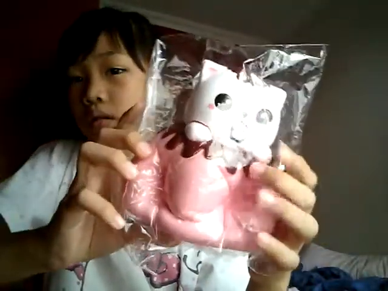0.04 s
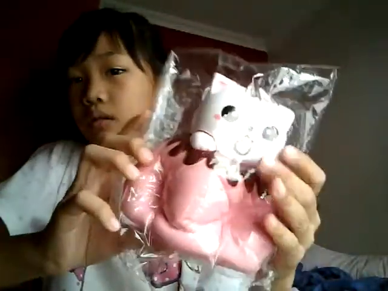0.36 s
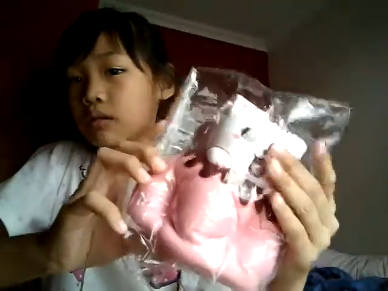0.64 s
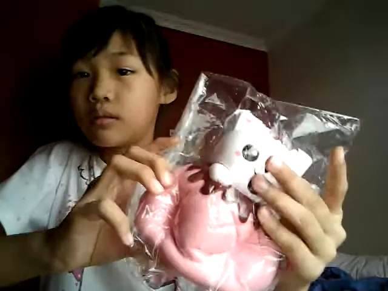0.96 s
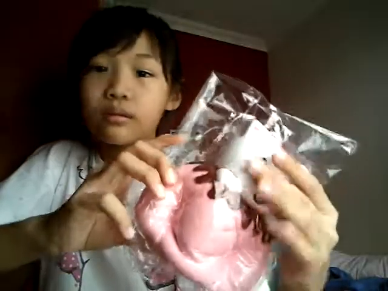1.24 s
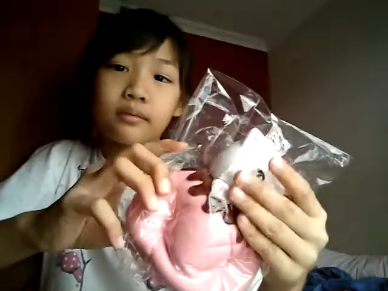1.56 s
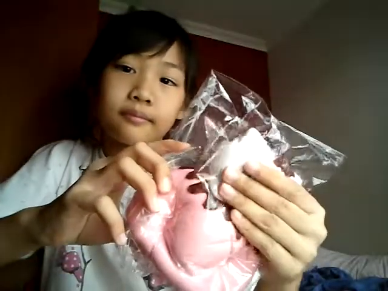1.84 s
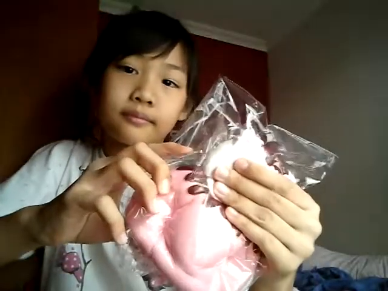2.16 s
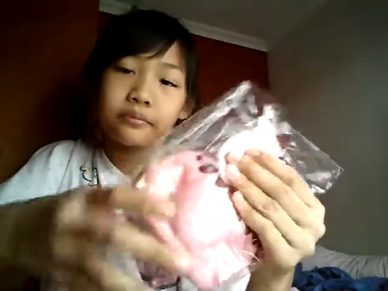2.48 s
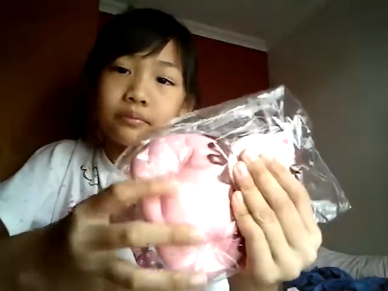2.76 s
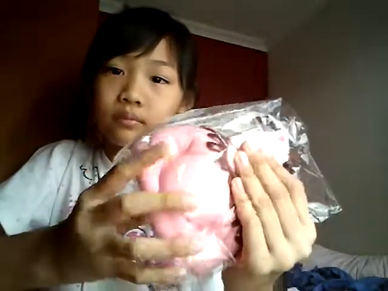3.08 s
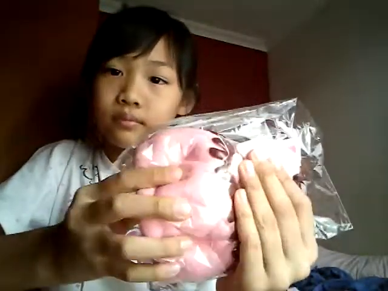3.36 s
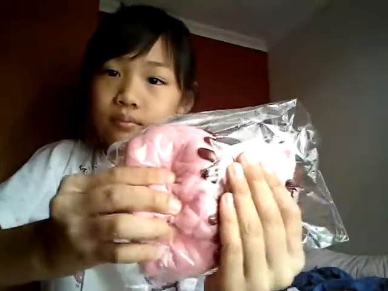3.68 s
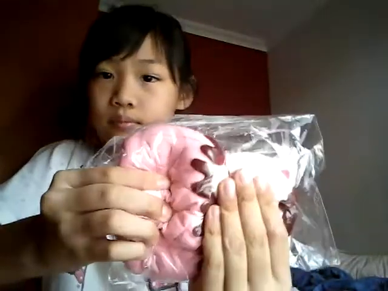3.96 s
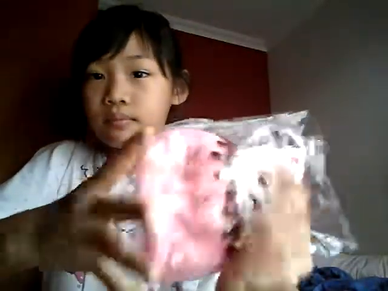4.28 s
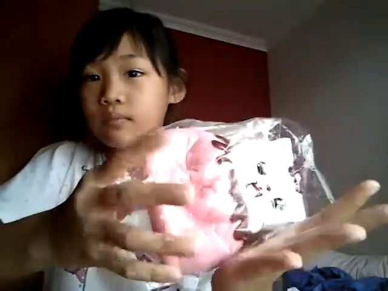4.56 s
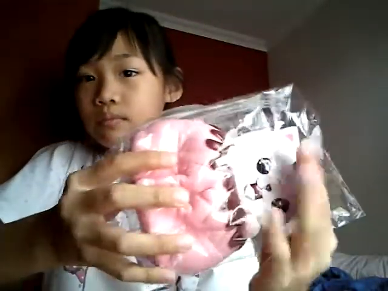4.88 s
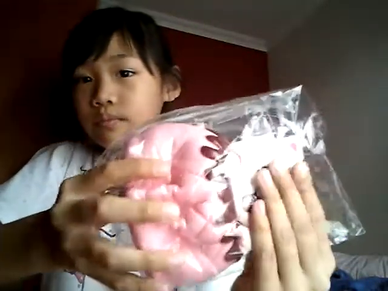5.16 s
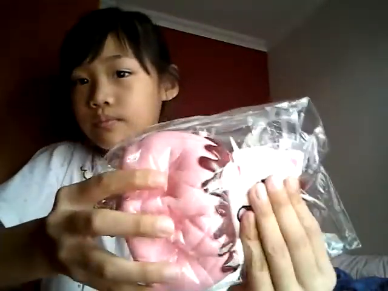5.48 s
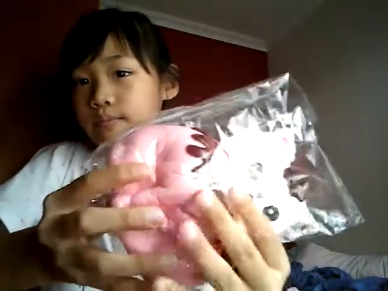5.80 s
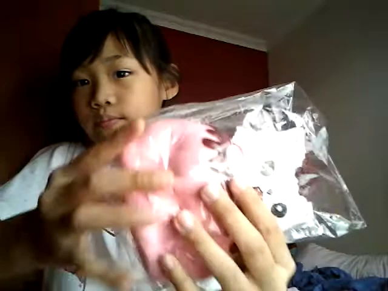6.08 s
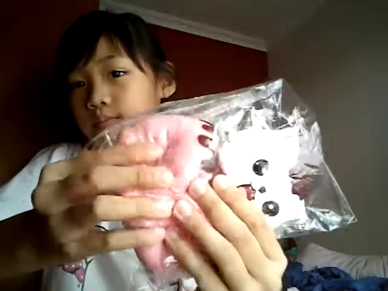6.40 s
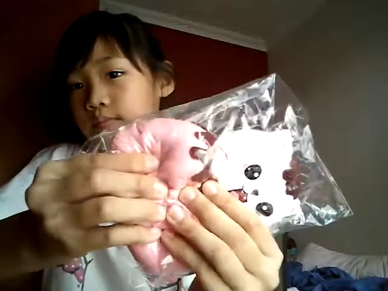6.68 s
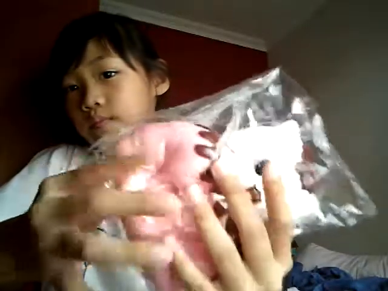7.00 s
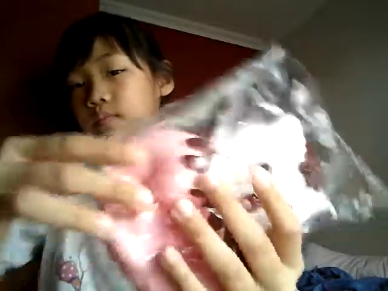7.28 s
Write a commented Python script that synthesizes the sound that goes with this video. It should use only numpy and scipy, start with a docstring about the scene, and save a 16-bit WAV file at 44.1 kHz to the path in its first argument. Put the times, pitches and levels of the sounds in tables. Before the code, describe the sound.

Thin plastic bag crinkling and crackling close up as a soft foam toy is squeezed and turned inside it.

```python
"""Thin plastic crackles close by in a quiet room: a soft foam toy is squeezed and turned inside a bag.
Each finger press sets off a run of tiny buckles: broad panels pop low, creases snap high, tips tick.
Between presses the held bag crackles more softly. Trapped air rings, film squeaks under a fingertip,
the toy rubs and thumps. Each buckle scatters off the hands and dies away in the room."""
import sys
import numpy as np
from scipy import signal
from scipy.fft import rfft, irfft, next_fast_len
from scipy.io import wavfile
from scipy.ndimage import map_coordinates

SR = 44100
rng = np.random.default_rng(int(sys.argv[2]) if len(sys.argv) > 2 else 0)


def store_pcm(level_fs):
    """Save levels as 16-bit WAV."""
    pcm = np.round(np.clip(level_fs, -1, 1) * 32767).astype(np.int16)
    wavfile.write(sys.argv[1], SR, np.atleast_2d(pcm).T)


N = 328104

# room noise spectrum: (frequency [Hz], relative density [dB])
ROOM_NOISE = [(35, -26), (55, -21), (76, 1.5), (95, -15.5), (135, -1), (180, -12), (1200, -21),
              (4000, -19.5), (15000, -62)]
# room decay: (frequency [Hz], T60 [s])
ROOM_DECAY = [(200, 0.73), (1000, 0.09), (5000, 0.23), (15000, 0.69)]
# microphone response: (frequency [Hz], gain [dB])
MIC_RESPONSE = [(40, 0), (130, 4.5), (250, 2.5), (500, 4), (850, 3), (1250, 1), (1500, -1), (2350, 6),
                (2650, 0.5), (3100, -1.2), (5400, -1.8), (8500, -2), (10500, -11), (13500, -10),
                (15800, -1)]
# resonances of its housing and surroundings: (centre [Hz], width [Hz], gain [dB])
MIC_RESONANCES = [(326.6, 83, 6.5), (426, 111, 6), (675, 113, 3.5), (1020, 390, 3), (1665, 253, 4),
                  (3650, 570, 2.5), (5520, 830, 3), (8770, 690, 1.5), (15500, 500, -3.5)]
# low shelf as the bag turns: (time [s], gain [dB])
LOW_SHELF = [(0, 3), (0.7, 6.5), (1.05, -0.5), (1.6, -1), (2.4, 2.5), (2.8, 2.5), (3.3, -2), (3.9, -3),
             (4.6, 3), (5.35, -3), (5.8, -2), (6.3, -1), (7.0, -0.5), (7.44, -3.5)]
# bumps of the toy as the grip shifts: (time [s], relative peak [dB])
TOY_BUMPS = [(1.017, -37), (2.366, -28), (2.392, -28), (3.285, -26), (7.298, -28)]
# film slipping under a fingertip: (mid time [s], pitch [Hz], relative level [dB])
FILM_SLIPS = [(1.75, 990, -29), (1.924, 1090, -34), (2.163, 1220, -30), (2.835, 1080, -33),
              (2.93, 1060, -34), (2.954, 1060, -30), (3.171, 1070, -36), (3.289, 1060, -29),
              (3.917, 1100, -24), (3.96, 980, -34), (3.98, 940, -28), (4.376, 1090, -33),
              (4.792, 1150, -32), (5.261, 1080, -27), (5.363, 1080, -30), (5.506, 1100, -31),
              (5.94, 1085, -27), (6.123, 1035, -33), (7.3, 1010, -24.5)]
# wide stretches of film inverting: (time [s], pitch [Hz], relative level [dB])
WIDE_POPS = [(1.003, 450, -34), (1.018, 435, -33), (1.331, 520, -28), (2.206, 603, -33), (2.889, 660, -32),
             (2.978, 690, -31.5), (3.069, 640, -34), (3.609, 620, -29), (3.896, 610, -31.5),
             (4.043, 690, -31), (6.126, 464, -33), (6.555, 680, -26.5), (6.998, 680, -30.5)]
# crackle of the held bag: (time [s], relative level [dB])
HELD_CRACKLE = [(0, -55), (0.64, -57), (1.08, -43), (1.9, -36), (2.45, -38.5), (2.62, -42), (2.8, -41),
                (2.95, -45), (3.05, -39), (3.5, -35), (3.85, -43), (4.05, -42), (4.14, -46), (4.25, -41),
                (4.42, -42), (4.67, -47), (4.95, -41), (5.1, -49.5), (5.35, -41), (5.95, -40), (6.5, -32),
                (6.8, -36), (7.2, -45), (7.44, -42)]
# its mix: (panels [dB], creases [dB], tips [dB])
HELD_MIX_DB = [0, -0.5, -15.5]
# presses: (start [s], length [s], relative panel level [dB], creases re panels [dB], tips re panels [dB])
FINGER_PRESSES = [(0.038, 0.012, -44, -3, -19), (0.113, 0.051, -42, -2, -11.5), (0.222, 0.04, -38, 0, -12),
                  (0.352, 0.047, -39.5, 1, -8.5), (0.427, 0.048, -39, -1, -14), (0.505, 0.08, -41, 0, -10),
                  (0.682, 0.063, -42, 0, -13), (0.814, 0.116, -39, 1, -15), (0.927, 0.087, -33, -1, -10.5),
                  (1.075, 0.067, -43, 3, -11), (1.188, 0.04, -37, 2, -8), (1.304, 0.068, -35, 0, -12),
                  (1.386, 0.049, -39, -1, -9), (1.496, 0.025, -33, -2, -14), (1.597, 0.027, -36, 3, -7),
                  (1.715, 0.067, -33, 2, -18), (1.842, 0.18, -34.5, -0.5, -13),
                  (2.085, 0.11, -36.5, -1, -9), (2.241, 0.082, -35, 0, -7), (2.345, 0.056, -35.5, 1, -10),
                  (2.451, 0.092, -34, 3, -10.5), (2.634, 0.025, -36, 1, -8), (2.673, 0.057, -33, 0, -10),
                  (2.753, 0.02, -41, 7, -11), (2.87, 0.03, -35, 1, -13), (2.985, 0.07, -35, -1, -9.5),
                  (3.101, 0.105, -40, -1, -7), (3.258, 0.07, -32, 1, -6.5), (3.37, 0.04, -38, 1, -6),
                  (3.435, 0.135, -35, 2.5, -6), (3.608, 0.07, -36, 1, -5.5), (3.707, 0.056, -42, 0, -9),
                  (3.814, 0.036, -37, -2, -24), (3.904, 0.035, -31, -3, -13), (3.952, 0.027, -39, -3, -8),
                  (4.026, 0.025, -33, -5, -9), (4.184, 0.075, -35, -2, -8), (4.258, 0.075, -29.5, 3, -9),
                  (4.329, 0.068, -34, 0, -8), (4.468, 0.085, -39, 0, -14), (4.58, 0.035, -41, 7, -8),
                  (4.723, 0.105, -41, 1, -10), (4.857, 0.012, -35, -1, -11), (4.903, 0.06, -37, -1, -10),
                  (4.973, 0.018, -39, 3, -14), (5.047, 0.012, -44, 2, -5), (5.122, 0.071, -32, 1, -13),
                  (5.196, 0.1, -31, 0.5, -11), (5.302, 0.106, -35, 0, -19), (5.421, 0.086, -37, 0, -16),
                  (5.593, 0.03, -36, -2, -2), (5.63, 0.03, -32, 0, -9), (5.726, 0.114, -34, -2, -24),
                  (5.972, 0.03, -39, 0, -10), (6.088, 0.067, -31, -2, -10), (6.213, 0.27, -30, -1.81, -11),
                  (6.551, 0.12, -29, -2, -11), (6.818, 0.069, -32, 0.5, -6), (6.896, 0.125, -31, 3.5, -7),
                  (7.043, 0.028, -42, 3, -14), (7.119, 0.07, -37, 0, -11.5), (7.24, 0.105, -31, -1, -15),
                  (7.39, 0.05, -31, 1, -15)]
# distinct buckles, relative levels: (time [s], panel [Hz], panel [dB], crease [Hz], crease [dB], tip [dB])
BUCKLES = [(0.0424, 1500, -41, 5400, -45, -69), (0.0726, 1620, -56, 5100, -42, -64),
           (0.1139, 1900, -39, 5000, -37, -57), (0.1419, 1960, -42, 4400, -37, -47),
           (0.2135, 1410, -47, 4900, -36, -52), (0.2297, 1810, -28, 4700, -30, -42),
           (0.2511, 1750, -39, 5700, -33, -50), (0.3553, 1570, -38, 4900, -36, -50),
           (0.3957, 1540, -32, 6800, -29, -32), (0.4366, 780, -38, 5500, -34, -47),
           (0.5574, 1430, -43, 5400, -36, -40), (0.5877, 1150, -35, 5200, -37, -46),
           (0.6749, 1820, -41, 4100, -40, -56), (0.6832, 2280, -39, 4200, -33, -53),
           (0.7369, 1190, -35, 6300, -42, -42), (0.7719, 2010, -39, 5400, -38, -57),
           (0.7827, 1510, -55, 5300, -36, -50), (0.8235, 1590, -31, 4600, -36, -46),
           (0.8459, 1870, -31, 4800, -34, -47), (0.8729, 1820, -37, 4700, -32, -46),
           (0.948, 1470, -28, 4900, -24, -40), (0.9948, 1580, -38, 5000, -29, -38),
           (1.0175, 1440, -34, 5000, -29, -48), (1.09, 1500, -38, 5300, -38, -41),
           (1.1411, 1660, -32, 4700, -33, -37), (1.172, 1190, -40, 4800, -34, -43),
           (1.2026, 1500, -41, 5400, -34, -38), (1.3132, 1650, -35, 5100, -27, -47),
           (1.3299, 1360, -26, 4600, -43, -59), (1.3393, 1670, -27, 5000, -30, -41),
           (1.3733, 1360, -37, 5600, -30, -45), (1.566, 1740, -32, 4200, -35, -48),
           (1.6904, 1220, -32, 5500, -27, -33), (1.7479, 1020, -25, 4100, -27, -43),
           (1.7607, 1200, -28, 5700, -34, -32), (1.7992, 1600, -29, 4500, -34, -50),
           (1.8445, 1520, -31, 4700, -30, -40), (1.8547, 1140, -25, 5400, -29, -33),
           (1.8818, 1470, -27, 4400, -26, -36), (1.9196, 1590, -27, 4500, -26, -41),
           (1.9925, 1840, -24, 3900, -27, -46), (1.9974, 1260, -22, 4700, -37, -45),
           (2.0678, 1300, -24, 3800, -34, -61), (2.1597, 1880, -27, 4700, -29, -43),
           (2.1801, 1400, -35, 4300, -31, -45), (2.2037, 1420, -29, 4600, -31, -43),
           (2.2278, 1720, -34, 5000, -27, -33), (2.2379, 1980, -24, 4500, -35, -43),
           (2.2436, 1010, -26, 4300, -27, -40), (2.3028, 1590, -26, 5000, -27, -37),
           (2.367, 1110, -20, 4200, -32, -38), (2.3731, 1150, -34, 5400, -30, -36),
           (2.3933, 970, -19, 4900, -32, -36), (2.4437, 1680, -36, 5200, -24, -40),
           (2.6011, 1830, -45, 5100, -40, -42), (2.6591, 1500, -46, 5500, -31, -48),
           (2.6868, 1340, -29, 5900, -32, -45), (2.7148, 1960, -25, 3600, -30, -54),
           (2.7834, 1170, -38, 5300, -32, -47), (2.8124, 1840, -41, 5100, -31, -59),
           (2.8576, 1240, -25, 4700, -34, -40), (2.8764, 1510, -28, 5000, -21, -34),
           (2.8927, 1460, -37, 5600, -28, -41), (2.9216, 1840, -41, 5200, -38, -39),
           (2.9585, 1630, -47, 5200, -35, -54), (3.0696, 1550, -24, 4400, -29, -40),
           (3.1037, 1990, -27, 3900, -27, -41), (3.1305, 1730, -28, 5200, -32, -49),
           (3.1876, 1770, -31, 6300, -32, -33), (3.2013, 1940, -50, 5200, -33, -37),
           (3.246, 1190, -29, 4200, -27, -35), (3.2676, 1240, -26, 5300, -28, -37),
           (3.4195, 1550, -27, 4100, -32, -38), (3.5327, 2120, -34, 5300, -24, -31),
           (3.5713, 1460, -27, 5000, -25, -34), (3.6089, 1210, -19, 4400, -30, -36),
           (3.6779, 1870, -27, 4600, -26, -37), (3.7239, 1790, -36, 5200, -33, -49),
           (3.7507, 1840, -35, 4400, -31, -37), (3.8317, 1870, -25, 4800, -36, -31),
           (3.8449, 1720, -27, 4000, -37, -60), (3.8932, 1870, -34, 4800, -30, -32),
           (3.9099, 1690, -44, 5900, -22, -48), (3.9286, 1740, -28, 5000, -31, -52),
           (3.978, 1380, -26, 5600, -40, -48), (3.994, 1910, -42, 5500, -33, -47),
           (4.0088, 1510, -29, 6800, -31, -37), (4.0402, 1440, -27, 6300, -46, -51),
           (4.0457, 880, -25, 5100, -31, -42), (4.0584, 1500, -26, 4900, -33, -51),
           (4.0948, 1770, -27, 5300, -40, -46), (4.1141, 1310, -24, 4600, -42, -60),
           (4.1561, 1970, -25, 5900, -32, -37), (4.2345, 1480, -23, 4800, -31, -39),
           (4.2955, 1570, -33, 4900, -21, -31), (4.3966, 1250, -27, 4500, -35, -52),
           (4.4649, 1950, -49, 4800, -34, -44), (4.4905, 1400, -32, 5200, -29, -46),
           (4.4949, 1380, -24, 3700, -34, -50), (4.5187, 1240, -27, 4600, -41, -60),
           (4.6231, 1300, -33, 4600, -32, -45), (4.6776, 1700, -36, 5300, -36, -44),
           (4.742, 1420, -30, 5100, -30, -46), (4.7657, 1440, -39, 4600, -33, -62),
           (4.876, 1210, -27, 4700, -27, -42), (4.9778, 1230, -33, 5200, -34, -40),
           (4.9845, 2180, -33, 4000, -29, -50), (4.9972, 2050, -24, 4400, -30, -53),
           (5.0335, 1540, -35, 4500, -27, -50), (5.134, 1260, -30, 4700, -30, -42),
           (5.1568, 1650, -39, 5200, -42, -35), (5.1659, 1670, -30, 5700, -24, -35),
           (5.2266, 1630, -25, 4800, -27, -40), (5.2757, 1760, -27, 4800, -32, -40),
           (5.2878, 1230, -28, 5500, -25, -37), (5.3695, 1240, -35, 4900, -29, -53),
           (5.3968, 1300, -33, 4700, -26, -52), (5.4461, 1380, -39, 4900, -32, -41),
           (5.4814, 1870, -34, 4200, -31, -43), (5.4994, 1750, -32, 5300, -28, -38),
           (5.5317, 1420, -35, 4700, -29, -50), (5.5458, 1420, -29, 6700, -33, -41),
           (5.6079, 1720, -27, 5500, -36, -47), (5.6349, 1820, -27, 4100, -27, -45),
           (5.6487, 2060, -41, 5100, -27, -39), (5.7433, 1650, -37, 5500, -24, -34),
           (5.7631, 1710, -24, 4000, -26, -41), (5.806, 1710, -23, 4400, -24, -38),
           (5.8503, 2110, -24, 4800, -33, -41), (5.8604, 1730, -30, 4900, -29, -39),
           (5.8833, 1980, -32, 4800, -32, -43), (5.9619, 1570, -28, 4300, -30, -42),
           (5.9762, 1510, -37, 5100, -30, -46), (6.0108, 1190, -38, 4500, -30, -47),
           (6.0301, 1980, -36, 5200, -22, -42), (6.0687, 1190, -51, 5200, -31, -35),
           (6.1128, 1260, -38, 4300, -28, -36), (6.3124, 1510, -34, 5400, -23, -34),
           (6.4015, 1870, -29, 6100, -30, -35), (6.5255, 1450, -39, 4800, -22, -48),
           (6.5536, 1370, -16, 6100, -27, -35), (6.609, 1020, -32, 4600, -22, -49),
           (6.6412, 1570, -35, 5500, -25, -37), (6.7725, 1850, -24, 4300, -28, -38),
           (6.867, 2000, -40, 4500, -26, -44), (6.8759, 1480, -25, 4000, -24, -36),
           (6.9098, 2050, -27, 4700, -25, -30), (6.9985, 1280, -23, 3900, -25, -37),
           (7.0567, 2130, -33, 5700, -25, -39), (7.0949, 1490, -30, 5600, -29, -34),
           (7.1269, 1860, -25, 5000, -29, -41), (7.1487, 2090, -34, 4700, -32, -48),
           (7.2352, 1760, -31, 4600, -29, -38), (7.2559, 1800, -24, 4500, -34, -44),
           (7.3169, 1740, -29, 6100, -32, -38), (7.3828, 1180, -34, 4700, -28, -49),
           (7.4102, 1580, -28, 4800, -29, -35)]

TOP_HZ = 15850


def amp(db):
    """Decibels to gain."""
    return 10 ** (np.asarray(db) / 20)


def unit(x):
    """Scale to rms 1."""
    return x / np.sqrt(np.mean(x ** 2) + 1e-20)


def along(points, hz):
    """Interpolate (Hz, value) points on a log axis."""
    knots_hz, values = np.transpose(points)
    return np.interp(np.log(hz + 1), np.log(knots_hz), values)


def curve(points):
    """Interpolate (s, value) points per sample."""
    return np.interp(np.arange(N) / SR, *np.transpose(points))


def wobble(knots_per_s):
    """Smooth random curve."""
    return map_coordinates(rng.standard_normal(2000), [np.arange(N) * knots_per_s / SR], mode="wrap")


def filtered(x, response):
    """Zero-phase filter; response maps Hz to gain."""
    size = next_fast_len(N + SR // 2)
    return irfft(rfft(x, size) * response(np.fft.rfftfreq(size, 1 / SR)), size)[:N]


def band(x, lo_hz, hi_hz, order=2):
    """Causal band-pass."""
    edges = np.minimum([lo_hz, hi_hz], SR / 2 - 1)
    return signal.sosfilt(signal.butter(order, edges, "band", fs=SR, output="sos"), x)


def place_peak(times_s, shapes, peaks):
    """Sum short sounds, one a row, each at its time and peak gain."""
    shapes = shapes * (peaks / np.abs(shapes).max(axis=1))[:, None]
    index = np.round(np.abs(times_s) * SR).astype(int)[:, None] + np.arange(shapes.shape[1])
    return np.bincount(index.ravel(), shapes.ravel(), N)[:N]


def place_rms(times_s, shapes, db, window_s=0.002):
    """Place short sounds by energy, given as rms over window_s."""
    rms = np.sqrt(np.sum(shapes ** 2, axis=1) / (window_s * SR))
    return place_peak(times_s, shapes, amp(db) * np.abs(shapes).max(axis=1) / rms)


def rings(hz, cycles, size, damping_spread=0.29):
    """Patches flip and swing out, each at its own damping, moving no net air."""
    phase = hz[:, None] * np.arange(size + 1) / SR
    life = cycles * np.exp(damping_spread * rng.standard_normal((len(hz), 1)))
    return np.diff(np.sin(2 * np.pi * phase) * phase * np.exp(-phase / life), axis=1)


def background(noise_db=-58, hum_db=-72, hum_hz=44.6, waver=0.62):
    """Quiet room noise and a low, wavering hum."""
    noise = unit(filtered(rng.standard_normal(N), lambda hz: amp(along(ROOM_NOISE, hz))))
    drift = unit(band(rng.standard_normal(N), hum_hz - 3, hum_hz + 3))
    hum = unit(np.sin(2 * np.pi * hum_hz * np.arange(N) / SR) + waver * drift)
    return amp(noise_db) * noise + amp(hum_db) * hum


def echo_paths(near_db=-5, near_t60_s=0.027, room_db=-7):
    """Impulse response: quick scatter off hands, toy and desk, then the room tail."""
    t = np.arange(SR // 3) / SR
    near, tail = rng.standard_normal((2, len(t)))
    near = near * amp(-60 * t / near_t60_s) * (t > 0.0006)
    hz, age_s, spectrum = signal.stft(tail, SR, nperseg=256)
    decay = amp(-60 * age_s / along(ROOM_DECAY, hz)[:, None])
    tail = signal.istft(spectrum * decay, SR, nperseg=256)[1][:len(t)] * (t > 0.005)
    return amp(near_db) * near / np.linalg.norm(near) + amp(room_db) * tail / np.linalg.norm(tail)


def reflections(x, spots=10, dwell_s=0.006):
    """Successive clicks leave different spots on the bag, each with its own paths."""
    position = np.arange(N) / SR / dwell_s
    wet = np.zeros(N)
    for spot in range(spots):
        distance = np.abs((position - spot) % spots - spots / 2)
        share = np.sqrt(np.maximum(1 - distance, 0))
        wet += signal.oaconvolve(x * share, echo_paths())[:N]
    return band(wet, 56, 16300, order=1)


def microphone(x, size=4096):
    """Microphone colour; minimum phase keeps click fronts sharp."""
    hz = np.fft.rfftfreq(size, 1 / SR)
    resonance_db = sum(db / (1 + (2 * (hz - centre_hz) / width_hz) ** 2)
                       for centre_hz, width_hz, db in MIC_RESONANCES)
    cepstrum = irfft(np.log(amp(along(MIC_RESPONSE, hz) + resonance_db)))
    cepstrum[1:size // 2] *= 2
    cepstrum[size // 2 + 1:] = 0
    return signal.fftconvolve(x, irfft(np.exp(rfft(cepstrum))))[:N]


def foam_toy(panel_db, rub_db=-28, thump_hz=190, thump_trim_db=-3):
    """The toy rubs dully as the panels move and gives a dead thump when bumped."""
    times_s, db = np.transpose(TOY_BUMPS)
    shapes = rings(np.full(len(times_s), thump_hz), cycles=0.066, size=1024)
    thumps = place_peak(times_s, shapes, amp(db + thump_trim_db))
    rub = amp(panel_db + rub_db) * unit(band(rng.standard_normal(N), 91, 400))
    return thumps + rub


def turning(x, shelf_hz=675):
    """The low, boxy part swells and thins as the bag turns."""
    lows = filtered(x, lambda hz: 1 / (1 + (hz / shelf_hz) ** 6))
    return x + (amp(curve(LOW_SHELF)) - 1) * lows


def air_pocket(panels, slack_hz=960, squeezed_hz=1140, width_hz=240, ring_db=-10.5):
    """Panel sound plus the ring of trapped air, whose note shifts with the grip."""
    slack, squeezed = (band(panels, hz - width_hz / 2, hz + width_hz / 2, order=1)
                       for hz in (slack_hz, squeezed_hz))
    grip = (1 + np.tanh(2 * wobble(knots_per_s=6))) / 2
    return panels + amp(ring_db) * ((1 - grip) * slack + grip * squeezed)


def squeaks(trim_db=-5, length_s=0.0094, glide_spread=0.064, overtone_db=-12):
    """Film sticks and slips for about ten cycles, gliding slightly up or down."""
    times_s, hz, db = np.transpose(FILM_SLIPS)
    t = np.arange(-(SR // 80), SR // 80) / SR
    swell = np.cos(np.pi * np.clip(t / length_s, -0.5, 0.5)) ** 2
    glide = glide_spread * rng.standard_normal((len(hz), 1))
    phase = 2 * np.pi * hz[:, None] * t * (1 + glide * t / length_s)
    tone = np.sin(phase) + amp(overtone_db) * np.sin(2 * phase)
    return place_rms(times_s + t[0], swell * tone, db + trim_db)


def pops(trim_db=-4.5):
    """Wide stretches of film turn inside out over the air in the bag."""
    times_s, hz, db = np.transpose(WIDE_POPS)
    return place_rms(times_s, rings(hz, cycles=0.41, size=2048), db + trim_db)


def strain_db(hush_db=2.2, hush_s=0.012, wake_db=2, wake_s=0.009):
    """Crackle dips as strain builds before each distinct buckle, then flares in its wake."""
    reach = SR // 10
    db = np.zeros(N + 2 * reach)
    t = np.arange(-reach, reach) / SR
    shape_db = np.where(t < 0, -hush_db * np.exp(t / hush_s), wake_db * np.exp(-t / wake_s))
    for time_s, *_ in BUCKLES:
        db[round(time_s * SR):][:len(t)] += shape_db
    return db[reach:][:N]


def film_levels_db(attack_s=0.016, sag_db_per_s=4, release_db_per_s=340, flutter_db=1.4):
    """Panel, crease and tip levels: held bag plus presses that take hold, ease and let go."""
    power = amp(curve(HELD_CRACKLE) + np.array(HELD_MIX_DB)[:, None]) ** 2
    for start_s, length_s, db, crease_db, tip_db in FINGER_PRESSES:
        start = round(start_s * SR)
        t = np.arange(min(SR // 2, N - start)) / SR
        fall_db = sag_db_per_s * (t - length_s / 2) + release_db_per_s * np.maximum(t - length_s, 0)
        press = np.minimum(t / attack_s, 1) * amp(db - fall_db)
        power[:, start:start + len(t)] += (amp([[0], [crease_db], [tip_db]]) * press) ** 2
    flutter = wobble(knots_per_s=60)  # folds give way in fits and starts
    return 10 * np.log10(power) + strain_db() + flutter_db * flutter


def buckle_times_s(level_db, mean_per_s=2000, crowding_db_per_db=0.9):
    """Random moments, denser the harder the film is worked."""
    density = amp(crowding_db_per_db * level_db)
    expected_count = np.cumsum(mean_per_s * density / density.mean()) / SR
    return np.searchsorted(expected_count, np.cumsum(rng.exponential(size=17000))) / SR


def crackle(times_s, size_db, centre_hz, spread_oct, cycles, scatter_db, band_hz, size, cap_db=15.5):
    """One family of film patches flipping in or out, levelled to even power."""
    pitch, strength, side = rng.standard_normal((len(times_s), 3)).T
    hz = np.minimum(centre_hz * 2 ** (spread_oct * pitch), TOP_HZ)
    db = np.minimum(size_db + scatter_db * strength, cap_db + scatter_db)
    peaks = np.sign(side) * amp(db) * np.sqrt(hz)  # slow patches swing longer and lower
    grains = band(place_peak(times_s, rings(hz, cycles, size), peaks), *band_hz)
    window = signal.windows.hann(SR // 28)
    power = np.abs(signal.fftconvolve(grains ** 2, window / window.sum(), "same"))
    return grains / np.sqrt(power + power.mean() / 1000)


def crinkle(panel_db, crease_db, tip_db, spread_db=7.5, evening_db_per_db=0.4):
    """One stream of small buckles drives panels, creases and crease tips together."""
    times_s = buckle_times_s(crease_db)
    # a hard squeeze evens the sizes into a fine sizzle
    effort_db = np.interp(times_s, np.arange(N) / SR, np.maximum(crease_db - crease_db.mean(), 0))
    size_db = spread_db * amp(-evening_db_per_db * effort_db) * rng.standard_normal(len(times_s))
    panels = crackle(times_s, 1.2 * size_db, centre_hz=1220, spread_oct=0.51, cycles=0.27,
                     scatter_db=2, band_hz=(110, 2830), size=320)
    creases = crackle(times_s, size_db, centre_hz=4290, spread_oct=0.57, cycles=0.53,
                      scatter_db=1, band_hz=(2280, 10600), size=64)
    tips = crackle(times_s, size_db, centre_hz=11350, spread_oct=0.25, cycles=0.83,
                   scatter_db=3, band_hz=(7760, 18600), size=32)
    beam_db = 3 * wobble(knots_per_s=58)  # tips beam their ticks past the microphone as folds turn
    return (amp(panel_db - 8) * air_pocket(panels)
            + amp(crease_db - 3.5) * creases
            + amp(tip_db + 3.5 + beam_db) * tips)


def snaps(panel_trim_db=-4, crease_trim_db=0.44, tip_trim_db=9, crease_s=0.00049, tick_s=0.0004):
    """Each distinct buckle flips a panel, cracks along a crease and ticks at its tip."""
    times_s, panel_hz, panel_db, crease_hz, crease_db, tip_db = np.transpose(BUCKLES)
    t = np.arange(160) / SR
    noise = rng.standard_normal((len(times_s), 2, len(t)))
    # a crease yields in tiny jumps, each ringing the same fold
    jumps = noise[:, 0] ** 3 * np.exp(-t / crease_s)
    folds = rings(crease_hz, cycles=0.58, size=64)
    cracks = band(signal.fftconvolve(jumps, folds, axes=1), 710, SR / 2)
    ticks = band(noise[:, 1] * np.exp(-t / tick_s), 7900, 16800)
    flips = rings(panel_hz, cycles=0.3, size=512)
    return (air_pocket(place_rms(times_s, flips, panel_db + panel_trim_db))
            + place_rms(times_s, cracks, crease_db + crease_trim_db)
            + place_rms(times_s, ticks, tip_db + tip_trim_db))


def scene(snap_send_db=-1):
    """Bag, reflections and toy over the background; snaps face the microphone and sound drier."""
    panel_db, crease_db, tip_db = film_levels_db()
    snapping = snaps()
    rustle = crinkle(panel_db, crease_db, tip_db) + pops() + squeaks()
    wet = reflections(amp(snap_send_db) * snapping + rustle)
    bag = turning(snapping + rustle + wet)
    return (microphone(bag + foam_toy(panel_db)) + background())[None]


def record(dry):
    """Brick-wall low-pass at TOP_HZ."""
    return filtered(dry[0], lambda hz: hz < TOP_HZ)[None]


dry = scene()
out = record(dry)
store_pcm(out)
```